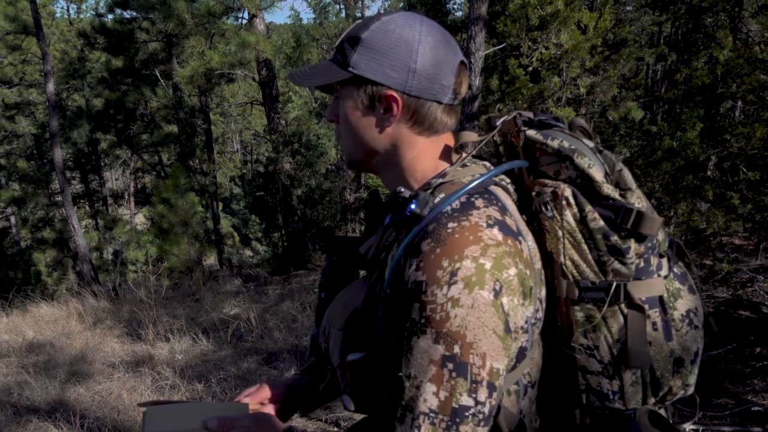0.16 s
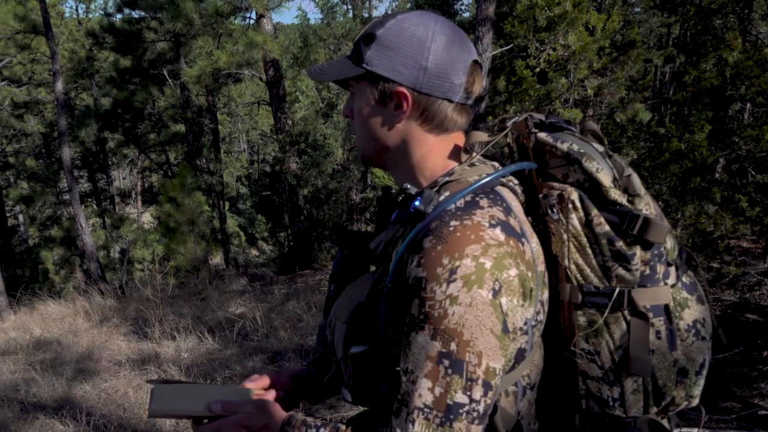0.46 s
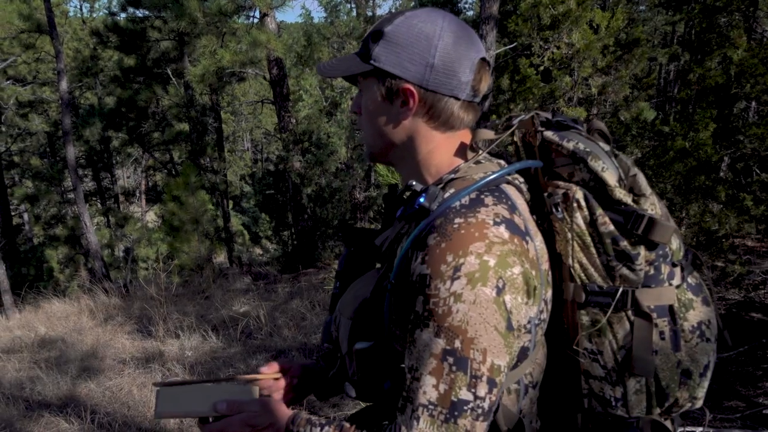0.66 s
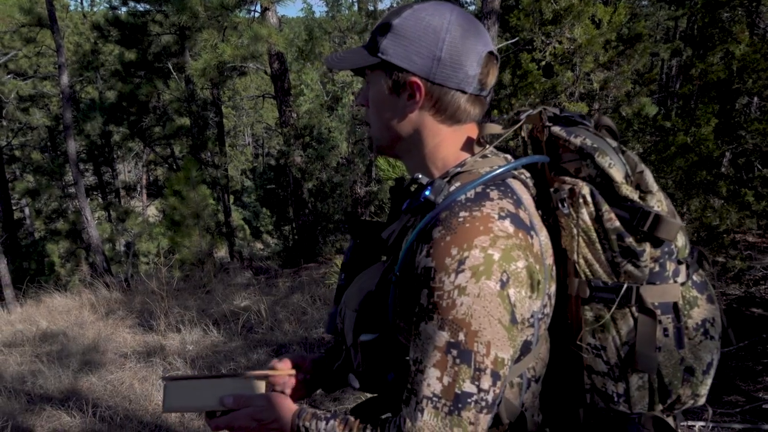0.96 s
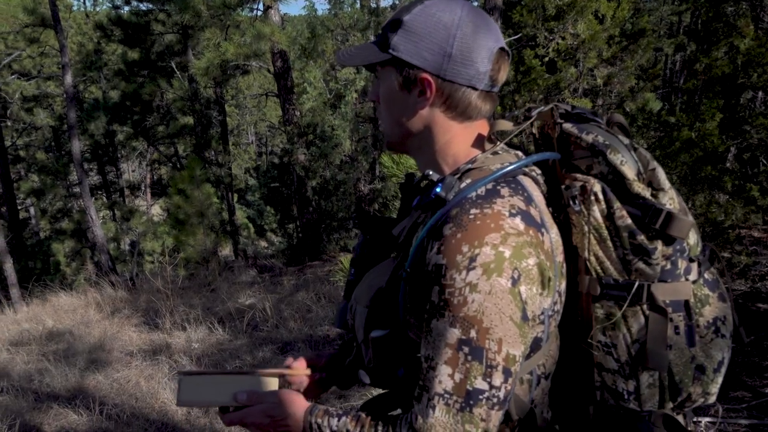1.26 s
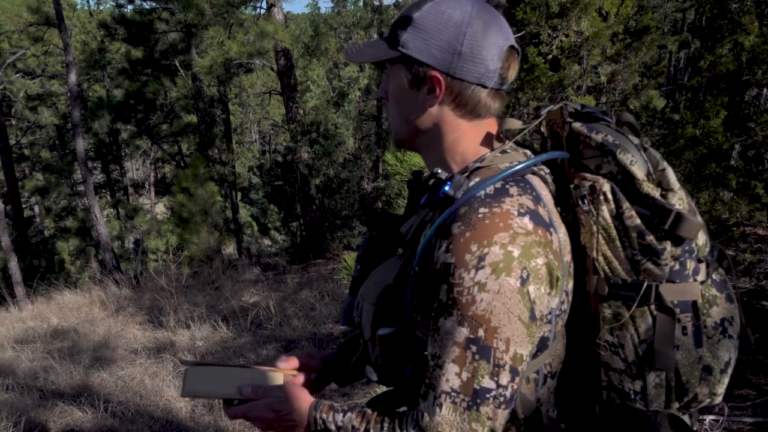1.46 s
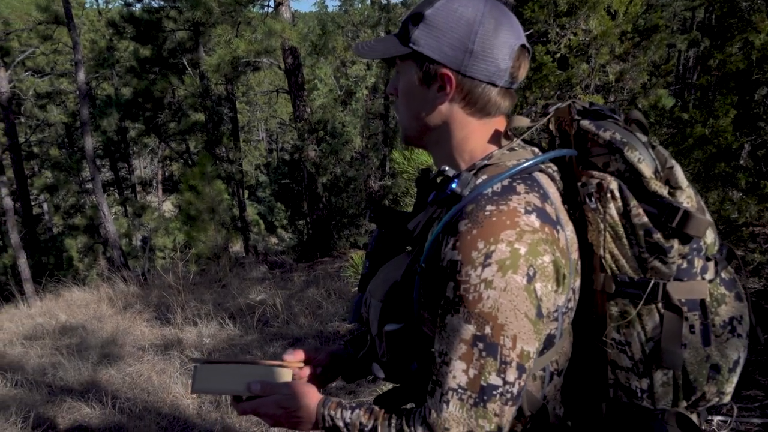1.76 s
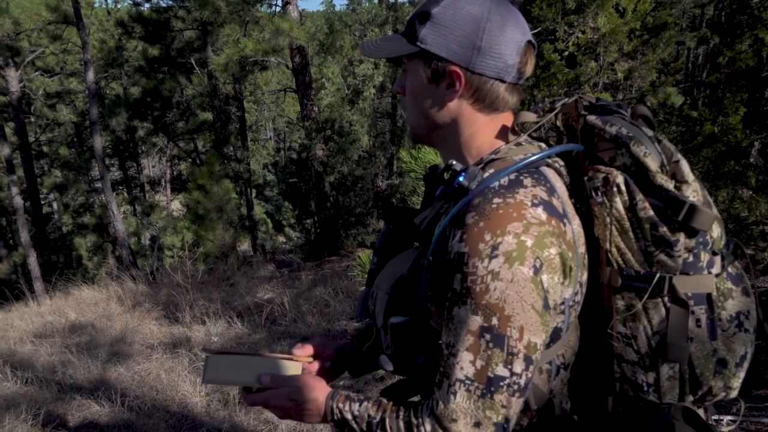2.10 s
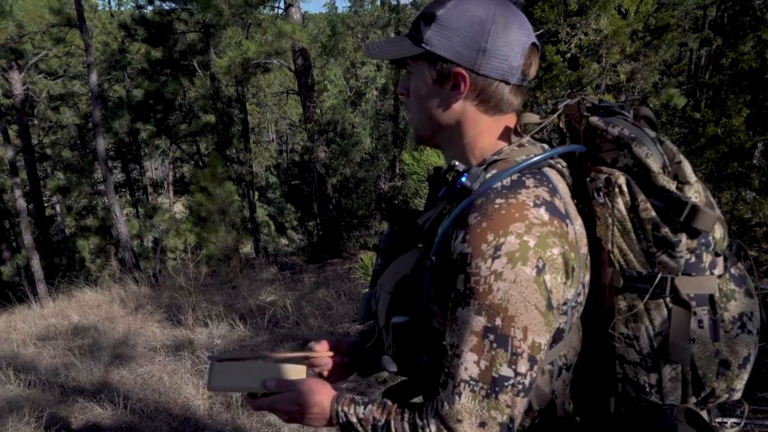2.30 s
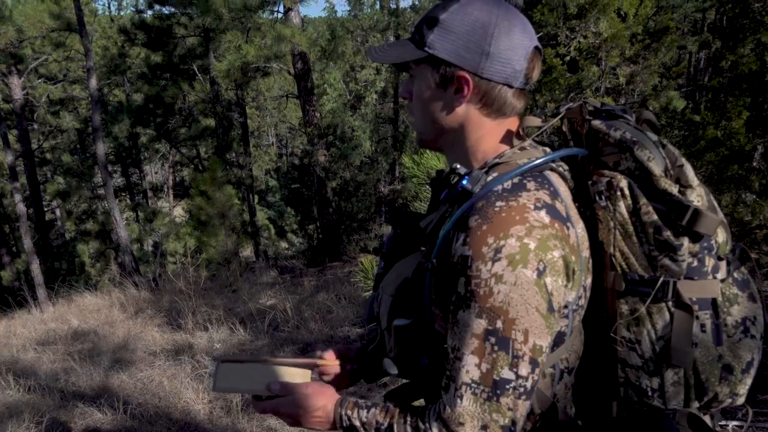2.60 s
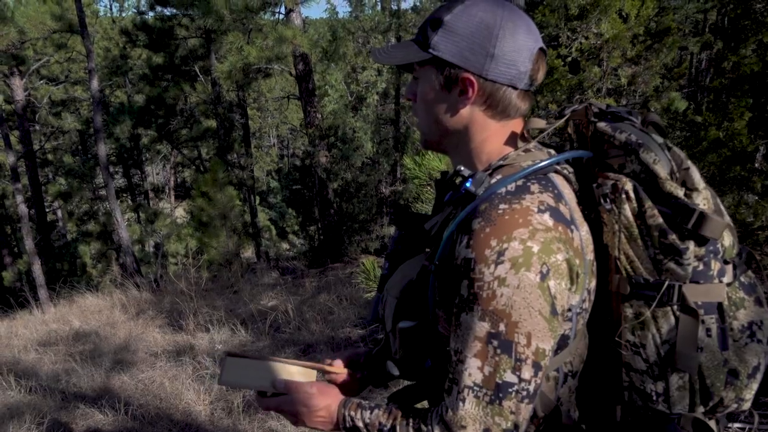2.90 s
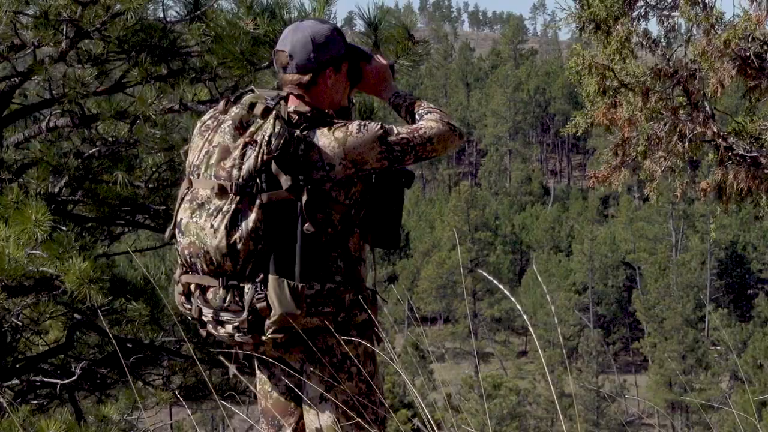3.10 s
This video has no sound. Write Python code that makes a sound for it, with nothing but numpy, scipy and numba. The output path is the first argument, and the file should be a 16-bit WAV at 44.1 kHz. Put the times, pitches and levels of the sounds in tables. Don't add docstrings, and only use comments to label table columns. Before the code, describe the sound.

A wooden turkey box call, about an arm's length away, yelps nine times, from 0.2 s to nearly 3 s, roughly every third of a second. Each stroke knocks, catches in a squeaky nasal tone, dips, cracks rougher, usually upward, and chatters off into a hollow woody ring. The first is longest and ends softest. An earlier call's echo opens; tree echo and faint breeze fill the gaps, with tiny creaks.

```python
import sys
import numpy as np
from scipy import signal
from scipy.fft import rfft, irfft
from scipy.io import wavfile
from scipy.ndimage import uniform_filter1d, minimum_filter1d
from numba import njit

SR = 44100
rng = np.random.default_rng(int(sys.argv[2]) if len(sys.argv) > 2 else 0)


def boost_factor(decibels):
    exponent = np.asarray(decibels, float) / 20
    return 10 ** exponent


def persist_wave(psi):
    counts = np.round(np.clip(psi, -1, 1) * 32767).astype(np.int16)
    wavfile.write(sys.argv[1], SR, np.atleast_2d(counts).T)


N = 143325
LEAD = 3 * SR // 4
M = N + LEAD
T = (np.arange(M) - LEAD) / SR

# freq_hz, level_db
BREEZE_COLOUR = [(25, 0), (50, 3), (90, -13), (350, -1), (700, -8.5), (4300, -20.5), (5500, -34.5),
                 (15000, -41)]
ECHO_COLOUR = [(300, 2.5), (1080, -8.5), (1700, -0.5), (4300, -2), (5200, -13), (7500, -9), (10000, -39.5)]
EARLIER_STROKES = [-.13, -.45]
# start_s, peak_db
CREAKS = [(0.0997, -58), (0.171, -61), (0.4763, -65), (2.1246, -60), (2.4446, -55), (2.4638, -59)]
# start_s, peak_db, hollow_mode_db, bright_edge_db, rebound_share
LID_KNOCKS = [(0.1812, -19.5, 17, -18, 0.12), (0.5101, -20, -1, -18, 0.76), (0.8709, -18, -11, -16, 0.27),
              (1.1935, -16.5, -1.5, -3, 0.28), (1.516, -16.5, -6, -2.5, 1),
              (1.8548, -15.5, -17, -4.5, 0.14), (2.177, -15.5, -12, -2.5, .15),
              (2.513, -16, -14.5, -8, 0.33), (2.835, -16, 0, -5.5, 0.13)]
# freq_hz, level_db, t60_s
LID_MODES = [(1730, -16, .03), (1918, 9, 0.016), (2535, -14.5, 0.035), (3160, -14.5, 0.017),
             (5850, -56, .004), (11100, -18, 0.0038)]
BOX_MODES = [(1080, 7.5, 0.037), (1234, 5, 0.02), (1700, -36, .04), (2172, -16.5, 0.04), (3091, -7, 0.046),
             (3921, -21.5, 0.06), (4730, -26.5, 0.03)]

# grip_s, highest_s, step_down_s, break_s, let_go_s
STROKE_TIMES = [(.2095, .224, .274, .318, .335), (.534, .543, .588, .619, .640),
                (.8888, .904, .930, .971, .984), (1.2193, 1.231, 1.252, 1.283, 1.298),
                (1.5388, 1.553, 1.575, 1.609, 1.635), (1.8943, 1.914, 1.925, 1.954, 1.977),
                (2.2142, 2.224, 2.238, 2.273, 2.291), (2.543, 2.553, 2.568, 2.600, 2.633),
                (2.8808, 2.890, 2.903, 2.926, 2.944)]
# grip_hz, highest_hz, before_break_hz, after_break_hz, level_db
STROKE_PITCH = [(1550.4, 1672, 1550, 1530, -20), (1564.5, 1680, 1590, 1790, -18),
                (1561.4, 1740, 1550, 1760, -18.5), (1593.5, 1712, 1570, 1795, -17.5),
                (1549.5, 1730, 1598, 1810, -17.5), (1609, 1725, 1575, 1810, -18.5),
                (1614, 1692, 1578, 1780, -18.5), (1653, 1712, 1620, 1830, -17.5),
                (1590, 1760, 1585, 1815, -17)]
# grip_db, break_db
STROKE_SCRAPE = [(-22, -29), (-17, -14), (-12.5, -29), (-16, -20), (-13.5, -6.5), (-6, -19), (-16.5, -26),
                 (-25, -11), (-6.5, -11.5)]
EDGE_CURVE = [-4, -2.5, 2.5, -4.5, 3, -2, 2, -5.5]
# start_s, end_s, pitch_hz; then start level_db and fade_db
CATCH_TIMES = [
    (.873, .885, 1520),
    (2.204, 2.211, 1500),
    (2.517, 2.5215, 1640),
    (2.531, 2.540, 1610),
    (-.04, .005, 1560),
    (1.2145, 1.216, 1600),
]
CATCH_LEVEL = [-23.5, -21, -24, -20, -23.5, -33]
CATCH_FADE = [-8.5, -7, -1, -7, -4.5, -3.5]

GRIP_PARTIALS = [-28.5, 0.5, -19, -30.5, -27.5, -48.5, -34, -36, -62, -42]
HIGH_PARTIALS = [-21, 0, -27.5, -34, -32.5, -19.5, -27, -37, -44, -32]
LOW_PARTIALS = [-21.5, -1, -18, -23, -22, -18.5, -22, -23.5, -31.5, -30]
BROKEN_PARTIALS = [-11.5, 0, -5, -11.5, -11, -23.5, -20, -28, -22.5, -21]
# upper partials flutter_db, then pitch share
STAGE_FLUTTER = [3.8, 1.9, 1.1, 4.7]
STAGE_JITTER = [0.0056, 0.0048, 0.002, 0.0046]
# freq_hz, width_hz, lift_db
WALL_MODES = [(3067, 98, 10.5), (5150, 250, 2.5), (6296, 130, 5)]
# colour (freq_hz, level_db), then four stages (level_db)
SCRAPE_COLOUR = [(300, -17.5), (600, -7), (900, -2.5), (1300, 4), (2500, -4.5), (5000, -18.5), (9000, -28),
                 (15000, -35)]
SCRAPE_STAGES = [-22, -27, -35.5, -16.5]
CHALK_COLOUR = [(2500, -20), (4500, -3.5), (9000, -6.5), (15000, -9.5)]
CHALK_STAGES = [-27.5, -27, -29, -29]
HAND_COLOUR = [(25, 0.5), (150, -5.5), (400, -6.5), (700, -30)]
HAND_STAGES = [-38.5, -37, -37.5, -23.5]

# start_s, loudest_s, last_s; then level_db, upper_modes_db
CHATTER_TIMES = [(.328, .336, .340), (.634, .648, .653), (.979, .989, .991), (1.294, 1.301, 1.307),
                 (1.626, 1.640, 1.648), (1.966, 1.979, 1.988), (2.285, 2.296, 2.298), (2.620, 2.638, 2.641),
                 (2.941, 2.948, 2.962)]
CHATTER_LEVELS = [(-47, -6), (-18, -4), (-18.5, -7), (-15, -3.5), (-18, -2.5), (-20, -2.5), (-22, -4),
                  (-23.5, -1.5), (-18.5, 2)]
# start_s, level_db
LAST_SLAPS = [(0.6457, -15.5), (0.988, -14.5), (1.2997, -14), (1.311, -22), (1.640, -16.5), (1.979, -15.5),
              (2.2947, -17.5), (2.6385, -21.5), (2.956, -18)]

ATTACK_S, RELEASE_S = 0.00416, 0.003876
CONTACT = np.hanning(7)
DUCK_TOP_DB = -32


def walk(rate):
    hold = int(SR / rate)
    steps = np.repeat(rng.standard_normal(M // hold + 1), hold)
    return 1.3 * uniform_filter1d(uniform_filter1d(steps, hold), hold)[:M]


def noise(colour, size=M):
    points = np.array(colour)
    hz = np.maximum(np.arange(size // 2 + 1) * SR / size, 1)
    tilt = boost_factor(np.interp(np.log(hz), np.log(points[:, 0]), points[:, 1])) * (hz > 15)
    x = irfft(rfft(rng.standard_normal(size)) * tilt, size)
    return x / x.std()


def ring(x, modes):
    out = 0
    for hz, db, t60 in modes:
        pole = np.exp(2j * np.pi * hz / SR - np.log(1000) / (t60 * SR))
        out = out + boost_factor(db) * signal.lfilter([1], [1, -pole], x).imag
    return out


@njit
def follow(x, keep):
    e, y = 0., np.empty(len(x))
    for i in range(len(x)):
        e = max(abs(x[i]), e * keep)
        y[i] = e
    return y


def excess_gain(x, top_db, slope, release_s):
    loud = follow(x, np.exp(-1 / (release_s * SR)))
    return (boost_factor(top_db) / np.maximum(loud, boost_factor(top_db))) ** slope


def breeze(call):
    gusts_db = 3 * walk(7)
    air = noise(BREEZE_COLOUR) * boost_factor(-54 + gusts_db)
    return uniform_filter1d(excess_gain(call, DUCK_TOP_DB, 0.56, 0.079), 60) * air


def trunk_echo(call):
    sent = call * (T > 0)
    first_stroke = call * (T > .19) * (T < .36)
    for s in EARLIER_STROKES:
        sent = sent + boost_factor(-3.5) * np.roll(first_stroke, int((s - .21) * SR))
    t = np.arange(SR) / SR
    t60_s, rise_s = 1.2, 0.024
    clumps_db = 1.5 * walk(60)[:SR]
    trunks = noise(ECHO_COLOUR, SR) * boost_factor(-60 * t / t60_s + clumps_db) * (1 - np.exp(-t / rise_s))
    dull = signal.sosfilt(signal.butter(2, 2520, fs=SR, output="sos"), trunks)
    trunks = dull + (trunks - dull) * boost_factor(-20 * t)
    echo = signal.fftconvolve(sent, trunks / np.sqrt(np.sum(trunks ** 2)))[:M] * boost_factor(-22.5)
    return uniform_filter1d(excess_gain(call, DUCK_TOP_DB, 0.35, 0.048), 60) * echo


def creaks():
    out = np.zeros(M)
    for s, db in CREAKS:
        i = int(s * SR) + LEAD
        out[i:i + 200] += boost_factor(db) * np.diff(rng.standard_normal(201)) * np.exp(-np.arange(200) / 60.)
    return out


def knocks():
    out, n = np.zeros(M), 2000
    split_hz, ring_s, stop_db = 2800, .005, -6
    low = signal.butter(3, split_hz, fs=SR, output="sos")
    high = signal.butter(3, split_hz, "high", fs=SR, output="sos")
    stop = boost_factor(stop_db * np.clip((np.arange(n) / SR - ring_s) / 0.00027, 0, 1))
    for s, db, hollow_db, edge_db, rebound in LID_KNOCKS:
        hit = np.zeros(n)
        hit[[0, 62, 74, 240]] = 0.12, -0.28, 0.97, rebound
        hit[55:85] += .1 * rng.standard_normal(30)
        hollow = (1250, hollow_db, .05)  # Hz, dB, t60 s
        wood = stop * np.diff(ring(np.convolve(hit, CONTACT)[:n], LID_MODES + [hollow]), prepend=0)
        knock = signal.sosfilt(low, wood) + boost_factor(edge_db) * signal.sosfilt(high, wood)
        i = int(s * SR) + LEAD - 44
        out[i:i + n] += boost_factor(db) * knock / abs(knock).max()
    return out


def strokes():
    step_s, step_share, break_s = .008, .62, .0015
    fall_hz_per_s, floor_hz = 9500, 1650
    step_db, break_db, end_db = -0.5, -4.5, -16
    for times, pitch, (grip_db, crack_db) in zip(STROKE_TIMES, STROKE_PITCH, STROKE_SCRAPE):
        a, top, step, brk, end = times
        grip, high, low, jump, db = pitch
        weak = jump < high
        held = high + 0.5 * (1668 - high)
        down = step + step_s / 2
        fall = max(jump - fall_hz_per_s * (end - brk), min(floor_hz, jump - 90))
        flat = min(brk + break_s + (jump - fall) / fall_hz_per_s, end - .001)
        flat_db = break_db + (end_db - break_db) * ((flat - brk) / (end - brk)) ** 2
        bright = min(a + 0.033, step - .012) if step - a > .04 else a + 0.0041
        rows = np.array([
            (a, grip, db - 1, 0),
            (top, high, db, 0),
            (step - step_s / 2, held, db - .6, 1),
            (down, held + step_share * (low - held), db + step_db, 2),
            (brk - .001, low, db + step_db - 100 * (brk - down), 2),
            (brk + break_s, jump, db + break_db - 6 * weak, 3 if jump > high else 2),
            (flat, fall, db + flat_db - 9 * weak, 3),
            (end, fall, db + end_db - 7 * weak, 3)])
        rows = np.column_stack([rows, EDGE_CURVE])
        early = rows[0] + np.array([.4, .75, .6, 0, .4]) * (rows[1] - rows[0])
        yield bright, np.insert(rows, 1, early, axis=0), (grip_db, brk, crack_db)
    for (a, b, hz), db, fade_db in zip(CATCH_TIMES, CATCH_LEVEL, CATCH_FADE):
        stage = 2 * (a < 0)
        rows = np.array([(a, hz, db, stage, 0), (b, hz * .95, db + fade_db, stage, -6)])
        yield b, rows, (-11, b, -40)


def stroke_controls():
    hz = np.full(M, 1600.)
    gain, stage, burst, scrape, edge_db = np.zeros((5, M))
    for bright, rows, (grip_db, brk, crack_db) in strokes():
        s, row_hz, row_db, row_stage, row_edge = rows.T
        a, b = s[0], s[-1]
        on = (T > a - ATTACK_S) & (T < b + RELEASE_S)
        on &= gain < boost_factor(row_db[-1] - 6)
        t = T[on]
        hz[on] = np.interp(t, s, row_hz)
        fade = np.clip(np.minimum((t - a) / ATTACK_S, (b - t) / RELEASE_S) + 1, 0, 1) ** 2
        gain[on] = boost_factor(np.interp(t, s, row_db)) * fade
        late = np.interp(t, s, row_stage)
        stage[on] = np.where(late > 1, late, np.clip((t - bright) / 0.0032, 0, 1))
        burst[on] = np.exp(-np.maximum(t - a, 0) / 0.0073)
        crack = (t > brk - .002) * np.exp(-np.abs(t - brk) / 0.0057)
        scrape[on] = boost_factor(grip_db) * burst[on] + boost_factor(crack_db) * crack
        edge_db[on] = np.interp(t, s, row_edge)
    return hz, gain, stage, burst, scrape, edge_db


def sing():
    hz, gain, stage, burst, scrape, edge_db = stroke_controls()
    on = gain > 0
    jitter = 0.00178 * walk(150) + np.interp(stage, range(4), STAGE_JITTER) * walk(900)
    phase = (np.pi * np.cumsum(hz * (1 + jitter)) / SR)[on]

    def at(levels):
        return np.interp(stage[on], range(4), levels)

    colours = np.array([GRIP_PARTIALS, HIGH_PARTIALS, LOW_PARTIALS, BROKEN_PARTIALS])
    out, slow, fast = np.zeros(M), walk(44.97), walk(700)
    for k in range(1, 20):
        partial_hz = k * hz[on] / 2
        db = at(colours[:, min(k, 10) - 1]) - 2.5 * max(k - 10, 0) + (k > 4) * edge_db[on]
        for mode_hz, width_hz, lift_db in WALL_MODES:
            db = db + lift_db / (1 + ((partial_hz - mode_hz) / width_hz) ** 2)
        wander = (k != 2) * min(0.53 + 0.33 * k, 5) * np.roll(slow, 9001 * k)[on]
        flutter = (k > 3) * at(STAGE_FLUTTER) * np.roll(fast, 9001 * k)[on]
        tone = np.sin(k * phase + rng.uniform(0, 6.64)) * (partial_hz < 16000)
        out[on] -= np.sqrt(2) * boost_factor(db + wander + flutter) * tone
    rasp = (boost_factor(2 * walk(250)) * noise(SCRAPE_COLOUR))[on]
    chalk = (boost_factor(2 * walk(600)) * noise(CHALK_COLOUR))[on]
    out[on] += (boost_factor(at(SCRAPE_STAGES)) + scrape[on]) * rasp
    out[on] += boost_factor(at(CHALK_STAGES)) * (1 - 1.2 * burst[on]) * chalk
    out[on] += boost_factor(at(HAND_STAGES)) * noise(HAND_COLOUR)[on]
    return gain * out


def chatter():
    body, upper, dry = np.zeros((3, M))
    for (a, peak, b), (db, up_db) in zip(CHATTER_TIMES, CHATTER_LEVELS):
        points = [a, peak - .004, peak, peak + 0.0016, b, b + 0.0016]
        for env, level_db, last in ((body, db - 2, 0.22), (upper, db + up_db, 0.69), (dry, db, 0.28)):
            env += boost_factor(level_db) * np.interp(T, points, [0, 0.61, 1, 0.7, last, 0])
    hz = np.interp(T, np.array(CHATTER_TIMES).ravel(), [1069, 1233, 1093] * len(CHATTER_TIMES))
    cycles = np.cumsum(hz * (1 + 0.053 * walk(350)) / SR)
    slips = np.diff(np.floor(cycles), prepend=0) * boost_factor(2.25 * walk(300))
    grit = 0.12 * rng.standard_normal(M)

    def struck(x, modes):
        return ring(np.convolve(x, CONTACT, "same") * 0.52, modes)

    walls = struck(slips * body, BOX_MODES[:2]) + struck((slips + grit) * upper, BOX_MODES[2:])
    rub = boost_factor(-13.5 + 4.9 * walk(400)) * noise(SCRAPE_COLOUR)
    rub = rub + boost_factor(-34) * noise(CHALK_COLOUR) + boost_factor(-29) * noise(HAND_COLOUR)
    return np.diff(walls, prepend=0) + dry * rub


def slaps():
    out, t = np.zeros(M), np.arange(3000) / SR
    t60_s, rise_s = 0.048, 0.0011
    note = np.sin(2 * np.pi * np.cumsum(1085.3 + 170 * np.exp(-t / .006)) / SR)
    for s, db in LAST_SLAPS:
        i = int(s * SR) + LEAD
        out[i:i + len(t)] += boost_factor(db - 60 * t / t60_s) * (1 - np.exp(-t / rise_s)) * note
    return out


def scene():
    call = creaks() + knocks() + sing() + chatter() + slaps()
    return (call + trunk_echo(call) + breeze(call))[None, LEAD:]


def band_limit(x):
    return signal.sosfilt(signal.butter(12, 15810, fs=SR, output="sos"), x)


def record(dry):
    gain = excess_gain(dry[0], -14, 0.37, 0.0017)
    held = dry * uniform_filter1d(minimum_filter1d(gain, size=41), size=41)
    top_cut = signal.ellip(8, .2, 60, 15800, fs=SR, output="sos")
    return band_limit(signal.sosfilt(top_cut, held))


dry = scene()
out = record(dry)
persist_wave(out)
```